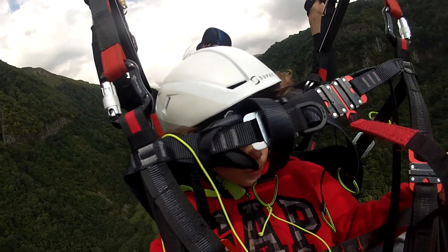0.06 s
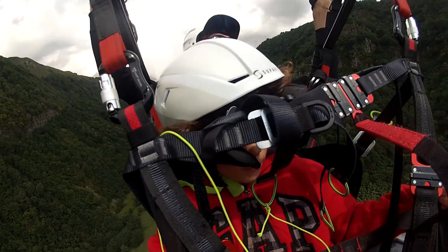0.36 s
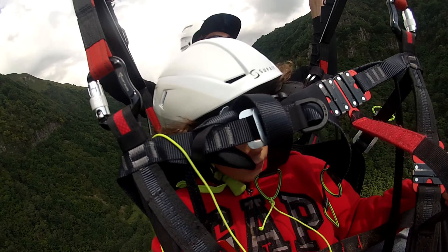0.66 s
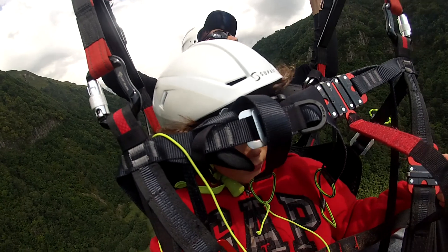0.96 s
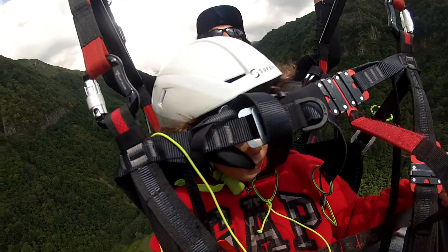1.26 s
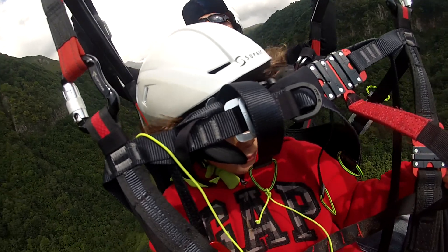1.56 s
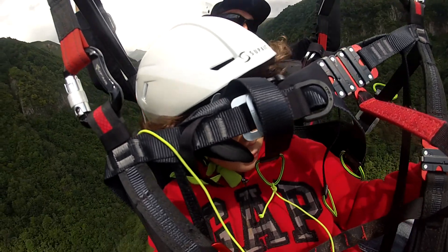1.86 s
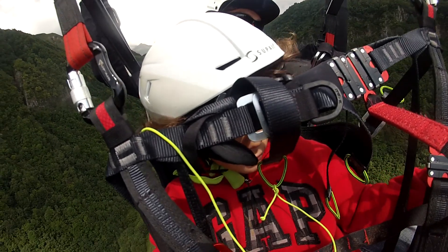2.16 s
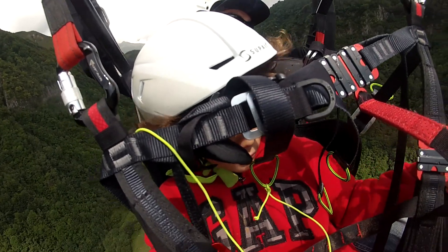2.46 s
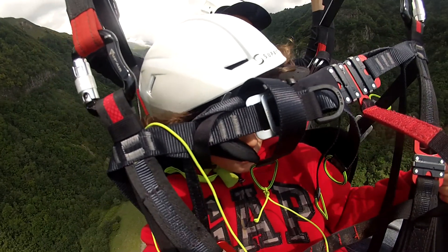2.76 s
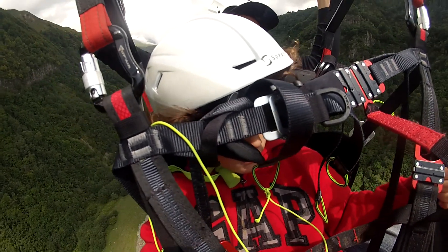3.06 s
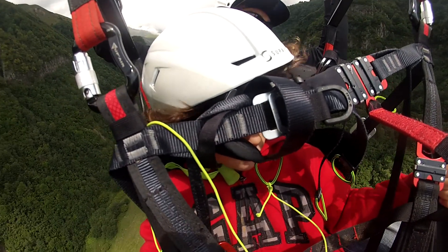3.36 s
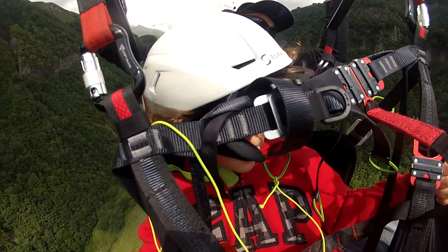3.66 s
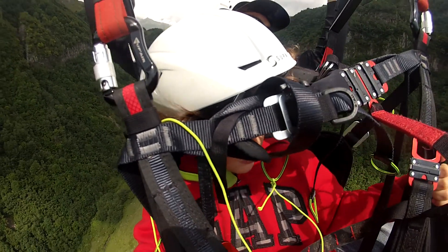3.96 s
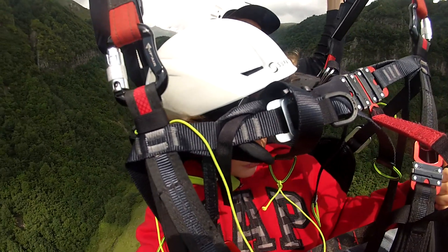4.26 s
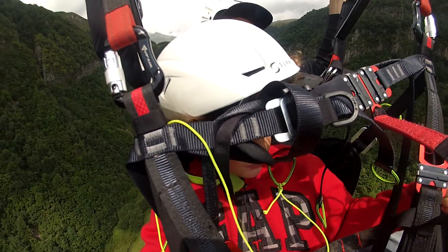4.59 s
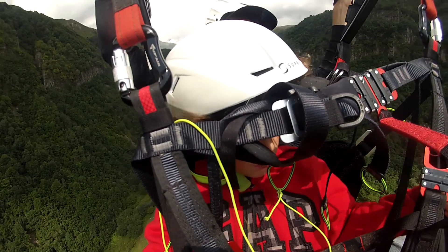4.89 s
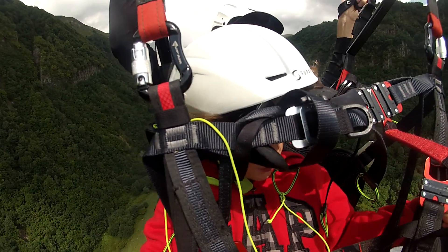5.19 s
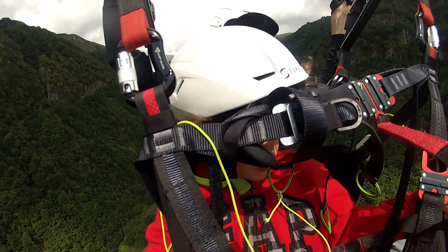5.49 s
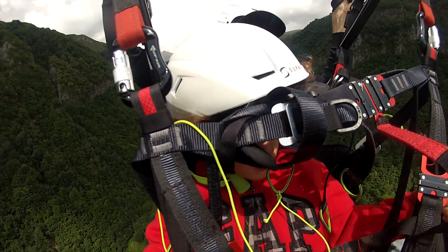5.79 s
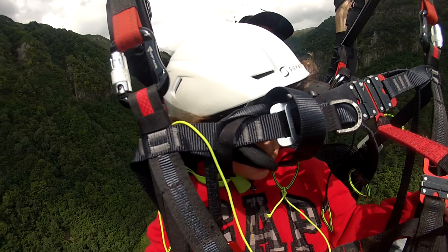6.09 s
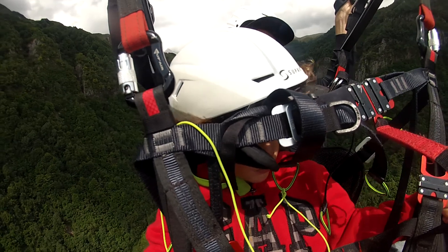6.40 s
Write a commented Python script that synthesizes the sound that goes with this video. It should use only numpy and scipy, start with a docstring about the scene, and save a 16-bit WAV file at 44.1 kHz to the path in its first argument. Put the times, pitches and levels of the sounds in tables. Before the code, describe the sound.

Wind buffets a camera microphone in flight, a low, gusty rumble with soft thumps and a faint rush of air through rigging.

```python
"""Wind buffeting the microphone of an action camera on a tandem paraglider, high above wooded mountains.
Open air, no echo at all. Right on the microphone, eddies make a dull rumble, now and then a harder thump.
Close by, air rushes through the rigging, where two lines sing faintly as they shed vortices.
At times the flow grazes the camera housing with a thin hiss."""
import sys
import numpy as np
from scipy import signal
from scipy.fft import rfft, irfft, next_fast_len
from scipy.io import wavfile
from scipy.ndimage import map_coordinates

SR = 44100
rng = np.random.default_rng(int(sys.argv[2]) if len(sys.argv) > 2 else 0)


def dump_mix(stems):
    """Bounce the given channels to the path in sys.argv[1] as a 16-bit WAV at rate SR."""
    frames = np.atleast_2d(stems).T  # one column per channel
    limited = np.clip(frames, -1, 1)  # hard clip at full scale
    pcm = np.round(limited * 32767).astype(np.int16)
    wavfile.write(sys.argv[1], SR, pcm)


N = 288414
TIME = np.arange(N) / SR

# airspeed, as the relative level of its rush: time_s, level_db
AIRSPEED_DB = [(0, -75.5), (.9, -76.5), (1.1, -76.5), (1.65, -74), (2.35, -72.5), (2.85, -75), (3.38, -73),
               (3.9, -74), (4.85, -75.5), (6.15, -73), (6.54, -73)]


def amp(db):
    """Decibels to gain."""
    return 10 ** (np.asarray(db) / 20)


def unit(x):
    """x at rms 1."""
    return x / np.sqrt(np.mean(x ** 2) + 1e-20)


def even(x, span_s):
    """x held near rms 1 over every span_s seconds."""
    window = signal.windows.hann(int(span_s * SR))
    weight = signal.fftconvolve(np.ones(N), window, 'same')
    power = signal.fftconvolve(x ** 2, window, 'same') / weight
    return x / np.sqrt(np.abs(power) + 1e-9)


def curve(rows):
    """Rows of time_s, value as one value per sample."""
    return np.interp(TIME, *np.transpose(rows))


def wobble(rate):
    """A smooth random curve, rate knots a second."""
    return map_coordinates(rng.standard_normal(int(N * rate / SR) + 4), [TIME * rate])


def swell(centre_s, width_s):
    """A smooth bump of height 1, width_s wide at half height."""
    return np.exp2(-np.minimum((2 * (TIME - centre_s) / width_s) ** 2, 20))


def swells(rows):
    """The summed gain of rows of centre_s, width_s, level_db."""
    return sum(amp(db) * swell(centre_s, width_s) for centre_s, width_s, db in rows)


def filtered(x, response):
    """x through a gain that depends on frequency."""
    size = next_fast_len(N + 8192)
    return irfft(rfft(x, size) * response(np.fft.rfftfreq(size, 1 / SR)), size)[:N]


def coloured(x, spectrum):
    """x shaped by rows of freq_hz, relative_db, at rms 1."""
    freq_hz, db = np.transpose(spectrum)
    return unit(filtered(x, lambda hz: amp(np.interp(np.log(hz + 1), np.log(freq_hz), db))))


def noise(spectrum):
    """Noise of rms 1 with the given spectrum."""
    return coloured(rng.standard_normal(N), spectrum)


def turbulence():
    """Rough air at the microphone: slow strength, then gust lifts of rumble, flutter and spill, in dB."""
    # slow strength: time_s, level_db
    strength = [(0, -41), (.62, -43.5), (1.0, -40), (1.25, -39.5), (1.6, -38), (1.9, -38), (2.5, -36),
                (2.92, -39), (3.38, -37.5), (3.75, -42.5), (4.25, -44), (4.7, -46.5), (5.05, -43),
                (5.9, -41), (6.2, -45.5), (6.54, -41)]
    # brief gusts and lulls: centre_s, width_s, rumble_change_db, flutter_change_db, spill_change_db
    gusts = [(0.16, 0.033, 0, 9.5, 5), (0.225, 0.058, -2.5, -11, -7), (1.291, 0.049, 5.5, 9.5, 1),
             (1.627, 0.056, 3, 7, 11.5), (1.755, 0.086, 1, 6, -1), (1.83, 0.24, -1, 3, 3),
             (2.065, 0.087, 3, 2, 6), (2.164, 0.19, -6, 4.5, 3.5), (2.263, 0.036, 2.5, -4, 0),
             (2.368, 0.11, -0.5, 8.5, 9), (2.78, 0.18, 0, -0.5, 0.5), (3.246, 0.06, -3.5, -2, 6),
             (3.336, 0.053, 5, 1, 8), (3.43, 0.12, -0.5, 9, 6), (3.534, .06, 1.5, -3, 8),
             (3.848, 0.037, -7, -3, 0), (4.3, .5, 0.5, -4, 1.5), (4.762, .04, -6.5, 0, 0),
             (5.08, 0.041, 3.5, 5, -3), (5.195, 0.046, -0.5, -8, -2), (5.565, 0.026, 0, 8.5, 0),
             (5.73, 0.013, -11, -1, -2), (6.055, 0.033, 3, 4, 0), (6.302, 0.25, 1.5, -3, 2),
             (6.43, 0.079, 1.5, 10, 0)]
    lifts = sum(np.outer(change_db, swell(centre_s, width_s)) for centre_s, width_s, *change_db in gusts)
    return curve(strength), *lifts


def buffeting(strength_db, lift_db):
    """Eddies rumble on the microphone; stronger gusts shift the weight from large eddies to smaller."""
    # large and middling eddies: freq_hz, relative_db
    deep_spectrum = [(8, -12), (20, 0.5), (45, -1.5), (75, 0.5), (110, -7), (160, -7.5), (220, -24),
                     (320, -44.5), (600, -86.5)]
    body_spectrum = [(30, -30.5), (70, -9.5), (110, -3), (155, -0.5), (200, -3), (240, -12), (300, -30),
                     (400, -46.5), (700, -88)]
    gust_db = strength_db - strength_db.mean()
    level_db = strength_db + lift_db + 1.03 * wobble(22)
    deep = amp(level_db - 0.36 * gust_db - 1.5) * even(noise(deep_spectrum), span_s=0.34)
    body = amp(level_db + 0.45 * gust_db - 4.0) * even(noise(body_spectrum), span_s=0.22)
    return deep + body


def thumps(rumble):
    """A passing vortex sweeps the rumble aside with one soft swing of pressure and puffs as it breaks."""
    # large eddies striking the microphone: centre_s, swing_db, pitch_hz, puff_db
    strikes = [(0.012, -33, 120, -95), (0.108, -34.5, 145, -86), (.166, -29.5, 178, -68),
               (0.266, -30, 113, -86), (0.415, -31.5, 88, -76), (0.497, -31.5, 131, -88),
               (.638, -35.5, 144, -87), (0.765, -30, 135, -88), (1.116, -27.5, 124, -86),
               (1.143, -29.5, 140, -91), (1.283, -25.5, 55, -67.5), (1.589, -25, 147, -66),
               (1.625, -26.5, 132, -71), (1.665, -27.5, 132, -75), (1.778, -35, 170, -75),
               (2.027, -26.5, 122, -69), (2.048, -26, 137, -76), (2.379, -27.5, 175, -71),
               (2.408, -28, 138.5, -74), (2.477, -26.5, 155, -77), (2.493, -26.5, 135, -66.5),
               (2.53, -28.5, 120, -82), (2.626, -25, 131, -66), (2.642, -28, 134, -77),
               (2.668, -28, 146, -77), (2.767, -29.5, 74.6, -86), (3.357, -24, 159, -68.5),
               (3.399, -27.5, 150, -72), (3.51, -29.5, 110, -76), (3.949, -33, 114, -86),
               (5.033, -28.5, 126, -70), (5.411, -29, 89, -86), (5.499, -34, 128, -73),
               (5.57, -33, 140, -72), (5.796, -29.5, 104, -87), (5.936, -29.5, 118, -90),
               (5.976, -31, 128, -83), (6.449, -33, 160, -77)]
    # a breaking vortex: freq_hz, relative_db
    puff_spectrum = [(200, -7), (370, 3), (560, -1), (780, -8.5), (1100, -12.5), (2000, -29), (4000, -50)]
    half_swing_cycles, half_puff_s, swept_share = 0.61, 0.019, 0.66
    swings, puffs, rumble_gain = np.zeros(N), np.zeros(N), np.ones(N)
    for centre_s, swing_db, pitch_hz, puff_db in strikes:
        near = np.abs(TIME - centre_s) < 0.1
        t = TIME[near] - centre_s
        envelope = np.exp(-(t * pitch_hz / half_swing_cycles) ** 2)  # shorter for a smaller vortex
        swings[near] += amp(swing_db) * envelope * np.sin(2 * np.pi * (t * pitch_hz + rng.random()))
        rumble_gain[near] *= 1 - swept_share * np.sqrt(envelope)
        puffs[near] += amp(puff_db) * np.exp(-(t / half_puff_s) ** 2)
    return rumble_gain * rumble + swings + puffs * noise(puff_spectrum)


def flutter(strength_db, speed_db, flutter_lift_db, spill_lift_db):
    """The smallest eddies flutter above the rumble, more at speed; strong gusts break into breathy spill."""
    # smallest eddies and spill: freq_hz, relative_db
    small_spectrum = [(100, -24.5), (190, -5.5), (245, 1), (300, -7), (360, -15.5), (450, -29.5),
                      (700, -40.5), (1500, -88.5)]
    spill_spectrum = [(200, -12.5), (400, 0.5), (580, -1.5), (800, -5.5), (1200, -13.5), (2000, -21),
                      (4000, -44)]
    gust_db = strength_db - strength_db.mean()
    small_db = -62.5 + 0.39 * gust_db + 0.74 * speed_db + flutter_lift_db + 2.65 * wobble(26)
    small = amp(small_db) * even(noise(small_spectrum), span_s=0.18)
    spill_db = -82 + 0.83 * gust_db + spill_lift_db + 1.1 * wobble(40)
    return small + amp(spill_db) * noise(spill_spectrum)


def rigging_rush(airspeed_db):
    """Air rushes over the harness and lines close by, with swells of a hollow tone."""
    # rush and hollow tone: freq_hz, relative_db
    rush_spectrum = [(150, -8.5), (450, -6.5), (800, -0.5), (1050, -3), (1330, 2), (1550, 2), (1790, -4),
                     (1980, -0.5), (2190, -4.5), (2430, -0.5), (2750, -12.5), (3200, -11.5), (4400, -16),
                     (5600, -24), (13000, -33.5)]
    hollow_spectrum = [(800, -35), (1150, -5.5), (1330, -1.5), (1540, -1.5), (1720, -10), (2400, -36)]
    # swells of the hollow tone: centre_s, width_s, level_db
    hollow_swells = [(.42, .6, -84), (1.08, 0.14, -77.5), (1.33, 0.28, -81.5), (1.68, 0.49, -78),
                     (2.38, 0.14, -81), (2.85, 0.4, -82.5), (3.42, 0.44, -77.5), (5.56, 0.06, -75),
                     (6.12, 0.12, -76.5)]
    rush = amp(airspeed_db + 1.27 + 0.33 * wobble(10)) * noise(rush_spectrum)
    return rush + swells(hollow_swells) * noise(hollow_spectrum)


def housing_hiss():
    """Air keeps tearing off an edge of the housing, so its hiss flutters and sputters with tiny ticks."""
    # spells of grazing air: start_s, length_s, level_db, attack_s, release_s
    grazes = [(1.45, .015, -82, 0.011, .015), (1.5, 0.266, -78.5, 0.12, 0.011),
              (1.78, 0.63, -78.5, 0.17, 0.011), (3.37, 0.16, -77.5, .003, 0.35),
              (4.28, 0.55, -93, 0.02, 0.1), (4.85, 0.83, -84, 0.43, 0.03), (5.7, .015, -79, 0.008, 0.02),
              (5.755, .46, -81, 0.046, 0.72)]
    # hiss at the edge: freq_hz, relative_db
    hiss_spectrum = [(2000, -25), (4500, -13), (6000, -11), (7000, -6), (7800, -5.5), (8600, -9),
                     (9300, -1), (9900, 1.8), (10600, -2.5), (11400, -4), (12800, -12)]
    ticks_per_s, tick_scatter_db, split_hz = 650, 4.5, 8600
    spells = np.zeros(N)
    for start_s, length_s, level_db, attack_s, release_s in grazes:
        rise = np.sqrt(np.clip((TIME - start_s) / attack_s, 0, 1))
        fall = np.clip(1 - (TIME - start_s - length_s) / release_s, 0, 1)
        spells += amp(level_db) * rise * fall
    tick_sizes = amp(tick_scatter_db * np.minimum(rng.standard_normal(N), 2)) * rng.choice([-1, 1], N)
    ticks = coloured(tick_sizes * (rng.random(N) < ticks_per_s / SR), hiss_spectrum)
    sputter = unit(amp(1.3 * wobble(26) + 1.8 * wobble(220)))
    hiss = amp(-2.5) * ticks + amp(-4.5) * noise(hiss_spectrum)
    low = filtered(hiss, lambda hz: hz < split_hz)
    low_flutter = amp(1.2 * wobble(20))  # the lower part also flutters on its own
    return spells * sputter * (hiss - low + low * low_flutter)


def aeolian_tone(speed_db, pitch_hz, width_hz, bend_per_db):
    """Vortices shed by a line: a narrow band of noise, even in strength, whose pitch rises with speed."""
    phase = 2 * np.pi * np.cumsum(pitch_hz * (1 + bend_per_db * speed_db)) / SR
    drifts = [filtered(rng.standard_normal(N), lambda hz: 1 / (1 + (hz / width_hz) ** 2)) for _ in range(2)]
    return even(drifts[0] * np.cos(phase) + drifts[1] * np.sin(phase), span_s=0.32)


def line_hum(airspeed_db, speed_db):
    """A thick line sheds vortices slowly and hums under the rush."""
    gain = amp(airspeed_db - 15.5 + 1.5 * wobble(1.4))
    return gain * aeolian_tone(speed_db, pitch_hz=714, width_hz=16, bend_per_db=0.002)


def line_whistle(speed_db):
    """A thin line sheds vortices fast and whistles faintly, a clear core in a little breath."""
    # swells of the whistle: centre_s, width_s, level_db
    whistle_swells = [(1.95, .9, -95), (3.74, .42, -92.5), (4.12, .3, -92), (4.55, .35, -100),
                      (4.9, .45, -94.5), (5.27, .38, -91.2), (5.8, .55, -90.5), (6.25, .5, -91.8)]
    pitch_hz = 3668
    local_speed_db = speed_db + 2 * wobble(7)
    core = amp(-3.3) * aeolian_tone(local_speed_db, pitch_hz, width_hz=18, bend_per_db=0.001)
    breath = amp(-2.7) * aeolian_tone(local_speed_db, pitch_hz, width_hz=80, bend_per_db=0.001)
    return swells(whistle_swells) * amp(wobble(9)) * (core + breath)


def microphone_hiss():
    """The microphone's own faint, steady noise."""
    # noise floor: freq_hz, relative_db
    floor_spectrum = [(1000, 1.5), (3000, 0.5), (4500, 3), (6000, 1), (7500, 3), (8800, -1.5),
                      (10000, -0.5), (13000, -5)]
    return amp(-83) * noise(floor_spectrum)


def scene():
    """All the wind at one microphone, in mono, over its own faint hiss."""
    floor = microphone_hiss()
    airspeed_db = curve(AIRSPEED_DB)
    speed_db = airspeed_db - airspeed_db.mean()  # above or below the mean airspeed
    strength_db, rumble_lift_db, flutter_lift_db, spill_lift_db = turbulence()
    wind = thumps(buffeting(strength_db, rumble_lift_db))
    wind += flutter(strength_db, speed_db, flutter_lift_db, spill_lift_db)
    rigging = rigging_rush(airspeed_db) + line_hum(airspeed_db, speed_db) + line_whistle(speed_db)
    return (wind + rigging + housing_hiss() + floor)[None]


def record(dry):
    """The camera keeps nothing above its band limit; the ends are eased in and out."""
    top_hz, fade_s = 12800, 0.008
    ends = np.clip(np.minimum(TIME, TIME[-1] - TIME) / fade_s, 0, 1)
    return np.array([filtered(channel * ends, lambda hz: hz < top_hz) for channel in dry])


dry = scene()
out = record(dry)
dump_mix(out)
```